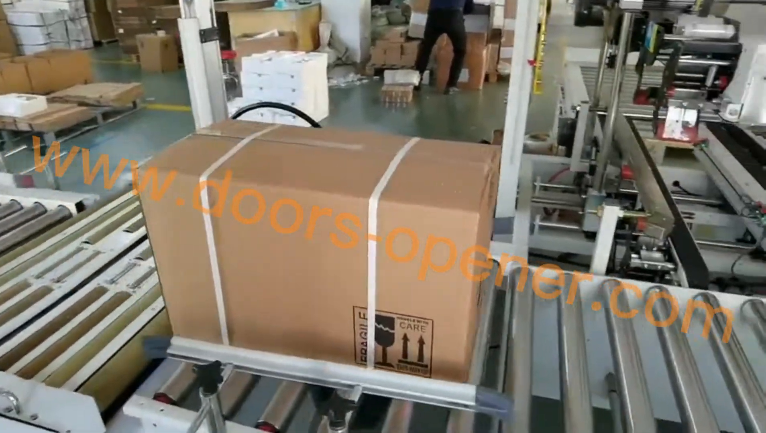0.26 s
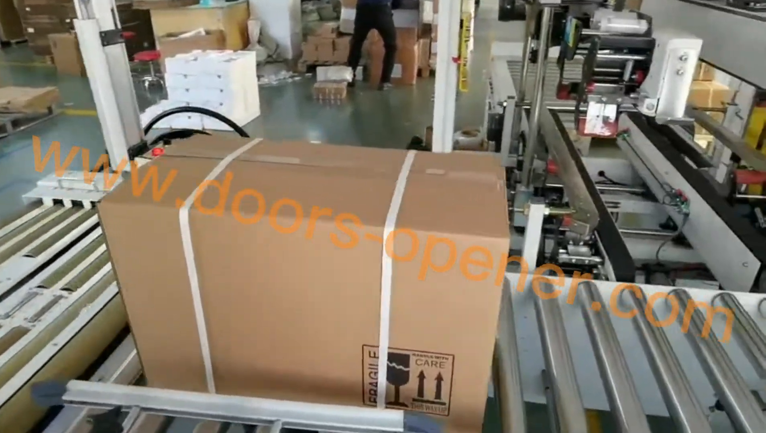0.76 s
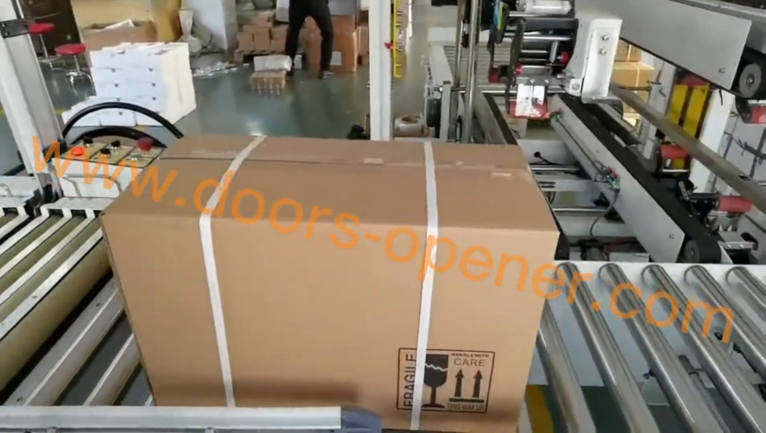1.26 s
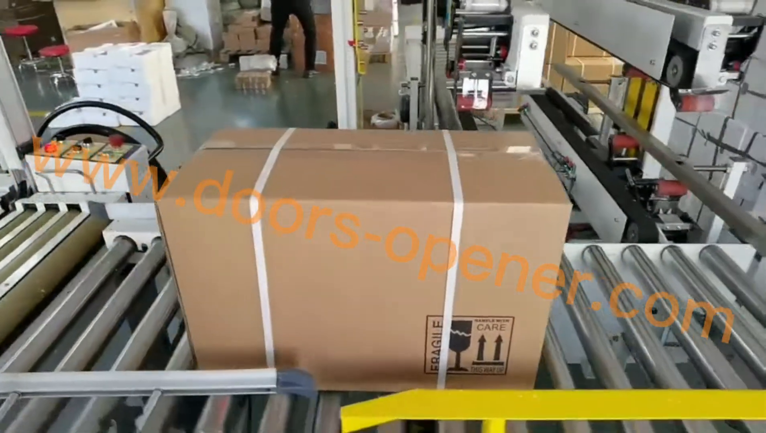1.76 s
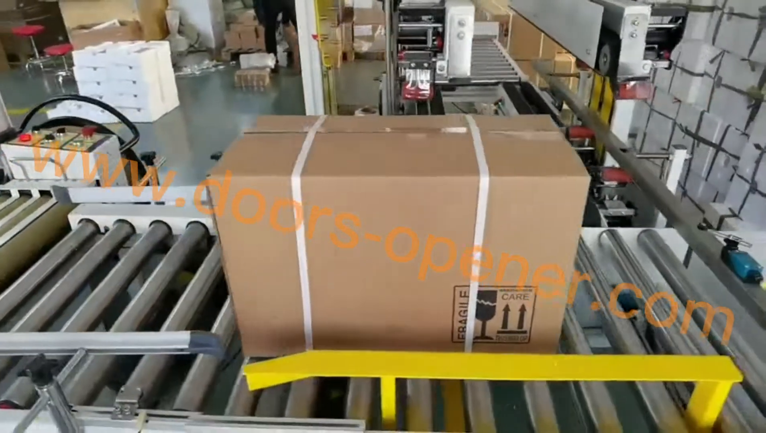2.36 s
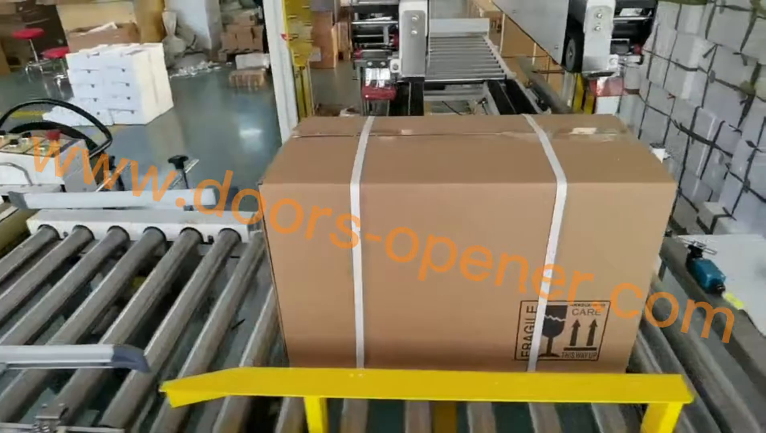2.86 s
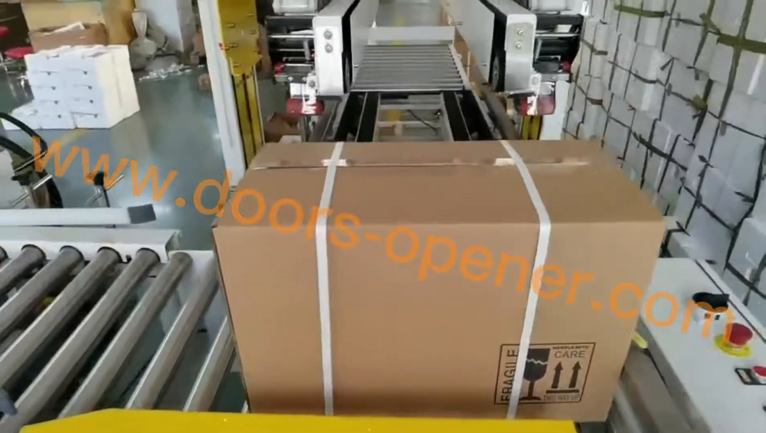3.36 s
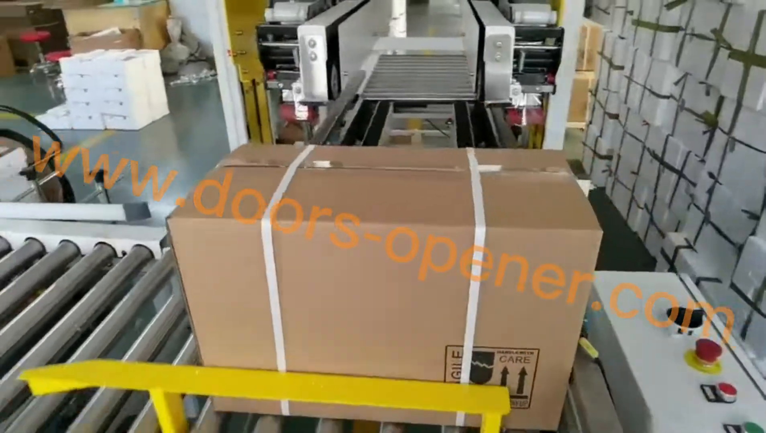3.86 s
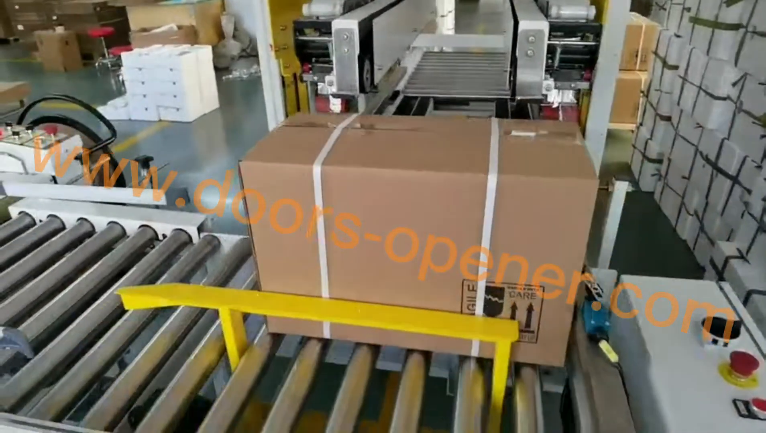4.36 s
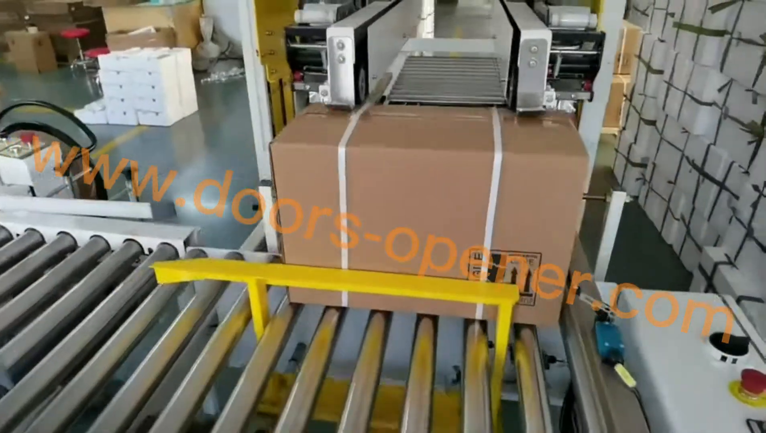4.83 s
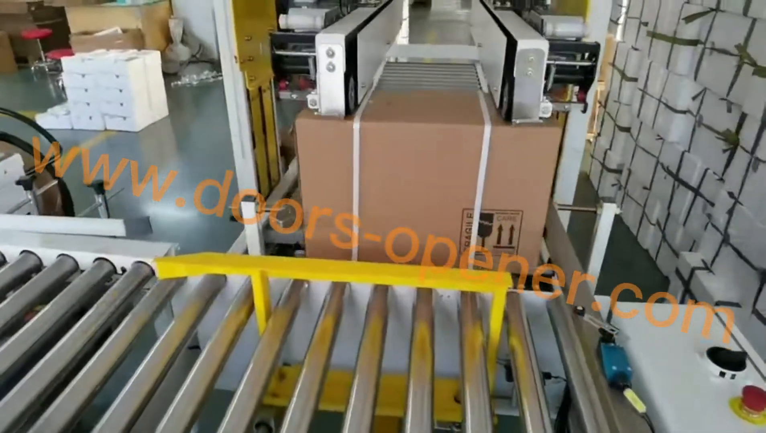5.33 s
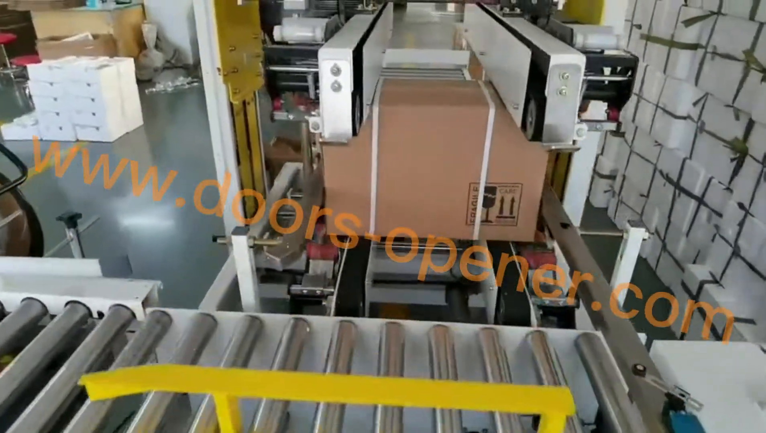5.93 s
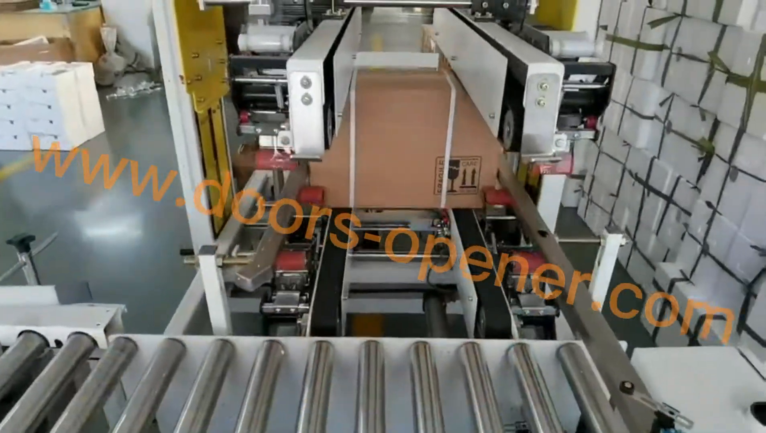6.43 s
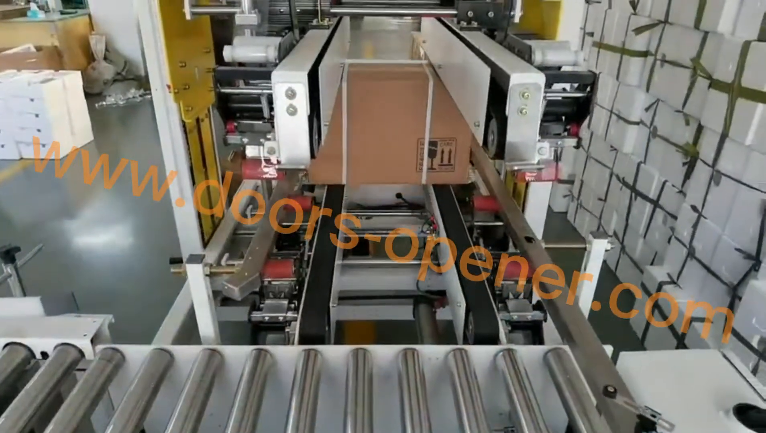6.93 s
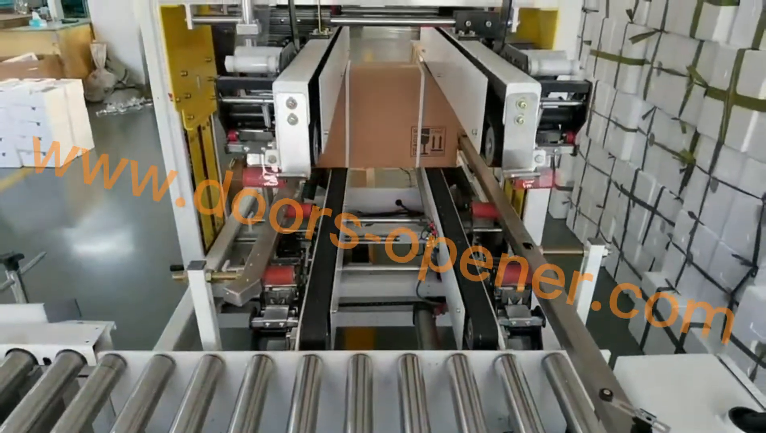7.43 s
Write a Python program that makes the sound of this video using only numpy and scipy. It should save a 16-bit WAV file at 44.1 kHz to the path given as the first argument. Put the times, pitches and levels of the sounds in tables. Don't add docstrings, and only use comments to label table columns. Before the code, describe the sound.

A conveyor whirrs and rumbles quietly before sharp bursts of escaping air, two hard clacks and short pneumatic puffs fill the factory hall.

```python
import sys
import numpy as np
from scipy import signal
from scipy.fft import rfft, irfft, next_fast_len
from scipy.io import wavfile

SR = 44100
rng = np.random.default_rng(int(sys.argv[2]) if len(sys.argv) > 2 else 0)


def natural_amplitude(level_db):
    exponent = np.asarray(level_db, float) / 20
    return 10 ** exponent


def unload_audio(sound):
    columns = np.transpose(np.atleast_2d(sound))
    steps = np.round(np.clip(columns, -1, 1) * 32767)
    wavfile.write(sys.argv[1], SR, steps.astype(np.int16))


N = 339129

# hz, left_right_likeness
EAR_LIKENESS = [(60, 0.72), (150, 0.92), (380, 1), (950, 0.5), (2380, 0.062), (5980, 0.099), (15000, 0.045)]
# hz, left_over_right_db
EAR_LEAN = [(60, 7), (150, 3), (380, 2), (950, 4.5), (2380, 7), (5980, -0.5), (15000, 7)]
ROLLER_LEAN = [(60, 2.5), (150, 2.0), (380, 0.5), (950, 3), (2380, 5), (5980, -1.5), (15000, 8)]

# time_s, rattle_db
ROLLER_LEVEL = [
    (0, -43.5),
    (1.2, -42),
    (1.9, -40),
    (2.8, -39.5),
    (6.7, -48.5),
    (7.69, -49),
]
# hz, db_per_hz
RATTLE_SPECTRUM = [(260, -34), (450, -1), (643, -7.5), (920, -4), (1280, -8), (1820, 1.5), (2380, -6),
                   (3030, 0), (4080, -7), (6180, -1.5), (6860, -7.5), (7730, -1), (11600, -22.5),
                   (14700, -27.5), (15800, -32)]

# time_s, bed_db, rails_db
CARTON_LOAD = [(0, -50, -51), (1.2, -50.5, -49), (2.7, -52, -47.5), (4.8, -46, -45.5), (4.89, -63, -50.5),
               (6.3, -61.5, -53.5), (6.9, -61, -54), (7.69, -57, -57)]
# peak_s, bed_db, rails_db, t60_s
CARTON_JOLTS = [(0.01, -38.5, -45, 0.46), (1.28, -46, -43.5, 1), (1.52, -41, -55, .4),
                (1.58, -55, -38.5, 1.5), (1.72, -55, -41, 0.4), (2.1, -42, -45, 1), (2.29, -57, -41.5, 0.5),
                (2.48, -60, -42.5, .9), (2.85, -38, -31.5, 0.47), (2.968, -24.5, -30.5, .6),
                (3.16, -41, -31.5, 0.33), (3.41, -37, -36, .5), (3.45, -31, -37, .5), (3.49, -40, -34, .25),
                (3.6, -33.5, -29, .5), (3.68, -35, -32, 0.46), (3.95, -38, -49, 0.67),
                (4.03, -36, -57, 0.47), (4.11, -37, -52, .2), (4.22, -38, -30, .5), (4.26, -28.5, -27, .5),
                (4.32, -40, -30.5, 0.57), (4.43, -37, -42, .3), (4.58, -36, -35, 1),
                (4.71, -33.5, -33, 0.37), (4.84, -36, -34, 0.12), (5.57, -53, -41.5, 1.14),
                (5.91, -44, -54, 0.49), (6.42, -35.5, -40.5, .7), (7.17, -42.5, -47.5, 0.51)]
# start_s, rise_s, hold_s, rails_db, t60_s
BELT_SHOVE = (7.62, .07, .1, -44, .3)
# hz, db_per_hz
RUMBLE_SPECTRUM = [(68, -21), (115, -6.5), (129, 0.5), (204, -5), (260, -0.5), (296, -3.5), (409, -6.5),
                   (541, -13.5), (700, -15.5), (910, -61), (1540, -120)]
# hz, width_hz, db_over_rumble
RAIL_HUM = [(132.7, 21, -10), (174, 27, -8), (204.3, 20, -10.5), (249.2, 23, -9.5), (300, 24, -10),
            (390, 39, -15.5)]

# start_s, peak_db, main_pitch_hz
STOP_BLOWS = [(1.314, -40, 200), (1.718, -37, 258), (2.266, -31, 320), (2.835, -31, 200), (3.131, -29, 278),
              (3.432, -26, 200), (3.577, -22, 450), (3.595, -23, 417), (4.238, -28, 220),
              (4.261, -23.5, 300), (4.699, -24, 300), (7.114, -36.5, 270), (7.647, -38.5, 270)]
# hz, level_db, t60_s
RAIL_MODES = [(140, -8, 0.33), (204, 0, 0.22), (270, -6, .22), (320, 3.5, 0.079), (418, 1.5, 0.094),
              (518, 0, 0.11), (676, 4, 0.047), (883, 0, 0.092), (2070, 20, .04)]

# start_s, peak_db, centre_hz, t60_s
TICK_EVENTS = [(0.1201, -29, 5980, 0.08), (0.196, -24, 8160, 0.07), (0.2693, -29, 6080, 0.087),
               (0.5707, -30, 7520, 0.16), (0.681, -20.5, 8090, 0.063), (0.9986, -25.5, 7980, 0.08),
               (1.3359, -39, 7850, 0.08), (1.489, -23.5, 7630, 0.074), (1.922, -24, 6070, 0.08),
               (1.9874, -29, 5770, 0.08), (2.1094, -33, 6600, 0.08), (2.1944, -29, 7980, 0.08),
               (2.368, -24, 7850, 0.08), (2.5094, -28, 6270, 0.08), (2.7496, -41, 6240, 0.08),
               (4.0053, -26, 7910, 0.071), (4.2862, -4, 7820, 0.07), (4.7012, -6, 7920, 0.053),
               (7.002, -39.5, 7690, 0.08), (7.1062, -35, 8410, 0.1), (7.1926, -39, 8230, 0.08),
               (7.231, -33, 7630, 0.08)]
# hz, db_per_hz
CRACK_SPECTRUM = [(2500, -30), (4000, -5), (8000, 5), (11000, -5), (16000, -15)]

# hz, db_per_hz
PUFF_SPECTRUM = [(290, -44), (500, -14), (836, -6), (901, -9), (1730, -7), (2310, 1), (2550, -7.5),
                 (7780, -15), (10000, -16.5), (13000, -51), (22000, -120)]

# start_s, end_s, from_hz, to_hz, level_db
THIN_WHISTLES = [
    (3.5, 3.67, 1590, 1620, -46.5),
    (3.699, 4.14, 1830, 1754, -48),
    (3.84, 4.01, 390, 390, -42.5),
    (3.802, 4.1, 1455, 1417, -47),
]
BREATHY_WHISTLES = [(2.846, 2.913, 7000, 7140, -26), (2.91, 2.96, 10000, 10160, -21),
                    (6.389, 6.442, 800, 840, -38), (6.442, 6.52, 900, 880, -29.5),
                    (5.835, 6.016, 841, 800, -40.5), (5.5, 5.74, 1943, 1850, -39)]
BROAD_WHISTLES = [
    (2.842, 2.9, 5550, 5600, -38),
    (2.963, 3.349, 3060, 2357, -37),
    (4.24, 4.294, 7200, 7500, -28),
    (6.217, 6.3, 4280, 3750, -38),
]

# hz, db_per_hz
JET_SPECTRUM = [(180, -26), (300, -22.5), (560, -20), (740, -15), (1030, -17), (1400, -13.5), (2190, -13.5),
                (3640, -16.5), (4660, -15), (7900, -1), (9600, -10), (10900, -17), (11500, -28.5),
                (15300, -31)]
# time_s, depth_db
JET_SPUTTER = [
    (2.9, 0),
    (4.7, 0.8),
    (4.85, 2.5),
    (5.3, 0.8),
    (5.45, 1),
    (5.8, 1.0),
    (6.5, 1.0),
]
# start_s, rise_s, hold_s, hiss_db, t60_s
PUSHER_VENT = [
    (2.86, 0.048, .01, -26.5, .2),
    (2.912, .012, 0.049, -16, 2.56),
    (2.914, .01, .004, -19, .35),
    (2.95, 0.31, 1.42, -27.5, 0.7),
    (3.86, 0.23, 0.056, -27.5, 1.9),
    (4.58, .12, .14, -22.5, 0.34),
]
PUSHER_STROKE = [
    (3.4, 0.14, 0.71, -45.5, .5),
    (4.2, 0.094, 0.49, -43, 0.44),
    (7.095, .006, .01, -52, .2),
]
CLAMP_VENT = [
    (4.74, 0.13, 0.863, -18, .3),
    (5.66, 0.063, .015, -22.5, 0.37),
    (5.9, .05, .5, -37, 0.33),
    (7.668, .012, .1, -30.5, .3),
]
FLAP_VENT = [
    (5.73, 0.035, 0.089, -26.5, .3),
    (5.79, .08, .035, -19, .27),
    (6.375, 0.014, 0.073, -18, 0.24),
]
GUIDE_VENT = [
    (6.205, .025, .005, -26, 0.62),
    (6.295, 0.027, .05, -21.5, .3),
]
# sizzle_db, rush_db, roar_db, breath_db (all over hiss), left_over_right_db
PUSHER_VOICE = (-12, -12, -29.5, -35.5, -3)
STROKE_VOICE = (-10, 2, 1.5, -7.5, -2.5)
CLAMP_VOICE = (-9, -13.5, -13, -20, -0.7)
FLAP_VOICE = (-18, -9.5, -13, -21, -1)
GUIDE_VOICE = (-15, -13, -24, -28, -.3)
BAND_LINGER = (0.99, 0.96, 1.2, 1.6, 1.85)


def rms_one(x):
    return x / np.sqrt(np.mean(x ** 2) + 1e-20)


def in_time(rows):
    time_s, *columns = np.transpose(rows)
    return [np.interp(np.arange(N) / SR, time_s, column) for column in columns]


def at_hz(points, hz):
    point_hz, value = np.transpose(points)
    return np.interp(np.log(hz), np.log(point_hz), value)


def drift(rate_hz):
    r = np.exp(-80 * np.pi * rate_hz / SR)
    slow = signal.lfilter([1], [1, -2 * r, r * r], rng.standard_normal(N // 40 + 2002))[2000:]
    return np.interp(np.arange(N) / 40, np.arange(len(slow)), rms_one(slow))


def coloured(spectrum, alike=0.87, lean=EAR_LEAN, direct=0.0, lag_samples=0):
    size = next_fast_len(N)
    hz = np.maximum(np.arange(size // 2 + 1) * SR / size, 1)
    mid, side = rfft(rng.standard_normal((2, size)))
    like = np.clip(np.maximum(alike * at_hz(EAR_LIKENESS, hz), direct), 0, 1)
    ears = np.sqrt(1 + like) * mid + np.sqrt(1 - like) * side * [[1], [-1]]
    ears[0] *= np.exp(-2j * np.pi * hz * lag_samples / SR)
    tilt = natural_amplitude(at_hz(lean, hz) / 2 * np.array([[1], [-1]]))
    return irfft(ears * tilt * natural_amplitude(at_hz(spectrum, hz)), size)[:, :N]


def band(x, low_hz, high_hz):
    sos = signal.butter(3, [low_hz, high_hz], "band", fs=SR, output="sos")
    part = signal.sosfilt(sos, x)
    return part / np.sqrt(np.mean(part.mean(axis=0) ** 2))


def narrow(width_hz):
    r = np.exp(-np.pi * width_hz / SR)
    real, imaginary = signal.lfilter([1], [1, -2 * r, r * r], rng.standard_normal((2, N)))
    return (real + 1j * imaginary) / np.sqrt(np.mean(real ** 2))


def chance_hits(rate_per_s, t60_s):
    hits = (rng.random(N) < rate_per_s / SR) * rng.exponential(1, N)
    return signal.lfilter([1], [1, -natural_amplitude(-60 / (t60_s * SR))], hits + 1e-18)


def dying(start_s, t60_s):
    age_s = np.arange(N) / SR - start_s
    return (age_s >= 0) * natural_amplitude(-60 * np.maximum(age_s, 0) / t60_s)


def swell(start_s, rise_s, hold_s, level_db, t60_s):
    age_s = np.arange(0, N + 20, 20) / SR - start_s
    release_s = np.maximum(age_s - rise_s - hold_s, 0)
    return (np.clip(age_s / rise_s, 0, 1) ** 2 * natural_amplitude(level_db - 60 * release_s / t60_s)) ** 2


def fill(coarse):
    return np.interp(np.arange(N) / 20, np.arange(len(coarse)), coarse)


def shaking():
    rise_s = 0.055
    bed_jolts = sum(swell(s - rise_s, rise_s, 0, bed_db, t60_s) for s, bed_db, _, t60_s in CARTON_JOLTS)
    rail_jolts = sum(swell(s - rise_s, rise_s, 0, rail_db, t60_s) for s, _, rail_db, t60_s in CARTON_JOLTS)
    rail_jolts = rail_jolts + swell(*BELT_SHOVE)
    bed_db, rails_db = in_time(CARTON_LOAD)
    bed_db = bed_db + 1.5 * drift(6)
    rails_db = rails_db + 1.2 * drift(4.4)
    return 10 * np.log10([natural_amplitude(2 * bed_db) + fill(bed_jolts), natural_amplitude(2 * rails_db) + fill(rail_jolts)])


def deep_floor():
    noise = coloured([(20, -14), (100, 0)], alike=.85, lean=ROLLER_LEAN)
    return natural_amplitude(-71.5 + 0.31 * (shaking()[0] + 52)) * band(noise, 20, 76)


def rollers():
    level_db, = in_time(ROLLER_LEVEL)
    throb = 1 + 0.12 * chance_hits(45, .12)
    throb = throb / np.sqrt(np.mean(throb ** 2))
    noise = coloured(RATTLE_SPECTRUM, alike=0.46, lean=ROLLER_LEAN)
    rattle = band(noise, 4570, 17300) * throb * natural_amplitude(1.22 * drift(34))
    whirr = band(noise, 510, 5590) * natural_amplitude(-3.5 + 0.66 * drift(9.1) + 1.17 * drift(26))
    return natural_amplitude(level_db) * (rattle + whirr)


def frame():
    bed_hz, bed_width_hz = 99.4, 16.2
    boom_db, rumble_db = shaking()
    turns = 2j * np.pi * np.arange(N) / SR
    wander = narrow(bed_width_hz)
    wander /= np.abs(wander) ** 0.4 + 1e-9
    boom = rms_one((wander * np.exp(bed_hz * turns)).real)
    hum = 0
    for hz, width_hz, level_db in RAIL_HUM:
        tone = (narrow(width_hz) * np.exp(hz * turns)).real
        hum = hum + natural_amplitude(level_db + 2.4 * drift(2.5)) * tone
    rumble = 0.59 * rms_one(coloured(RUMBLE_SPECTRUM)) * natural_amplitude(0.54 * drift(23))
    opposed = natural_amplitude([[.8], [-.8]])
    return (natural_amplitude(boom_db) * boom + natural_amplitude(rumble_db) * hum) * opposed + natural_amplitude(rumble_db) * rumble


def thuds():
    out = np.zeros(N)
    luck_db = rng.normal(0, 0.46, (len(STOP_BLOWS), len(RAIL_MODES)))
    for (start_s, peak_db, main_hz), blow_luck_db in zip(STOP_BLOWS, luck_db):
        start = round(start_s * SR)
        age_s = np.arange(min(SR // 2, N - start)) / SR
        for (hz, mode_db, t60_s), extra_db in zip(RAIL_MODES, blow_luck_db):
            near_db = -12 * abs(np.log2(hz / main_hz))
            fall = natural_amplitude(mode_db + extra_db + near_db - 60 * age_s / t60_s)
            ring = fall * np.sin(2 * np.pi * hz * age_s)
            out[start:][:len(age_s)] -= natural_amplitude(peak_db - 4.5) * ring
    return out * natural_amplitude([[.8], [-.8]])


def ticks():
    out = np.zeros((2, N))
    crack = band(coloured(CRACK_SPECTRUM, direct=0.35), 2700, 12000)
    for start_s, peak_db, hz, t60_s in TICK_EVENTS:
        start = round(start_s * SR)
        at = slice(start, min(N, start + SR // 4))
        age_s = np.arange(at.stop - at.start) / SR
        ring = np.sin(2 * np.pi * hz * age_s) + 0.2 * np.sin(2 * np.pi * 1.2 * hz * age_s)
        ring = natural_amplitude(-60 * age_s / (0.47 * t60_s)) * ring
        burst = 0.47 * natural_amplitude(-60 * age_s / t60_s) * crack[:, at]
        out[:, at] += natural_amplitude(peak_db - 8.5) * (ring + burst)
    return out


def puff():
    start_s, level_db, hold_s, t60_s = 1.553, -31.5, 0.078, 0.39
    noise = coloured(PUFF_SPECTRUM, alike=.6, direct=0.16)
    out = 0
    for low_hz, high_hz, part_db, late_s, stretch in [(1500, 12000, -3, 0, 0.86), (400, 1400, -9.5, 0.05, 1.35)]:
        rise = np.clip((np.arange(N) / SR - start_s) / (0.0085 + late_s), 0, 1)
        fall = np.minimum(1, dying(start_s, stretch * t60_s) * natural_amplitude(60 * hold_s / t60_s))
        out = out + natural_amplitude(level_db + part_db) * rise * fall * band(noise, low_hz, high_hz)
    return out


def whistles():
    out = np.zeros(N)
    t = np.arange(N) / SR
    for rows, width_hz in [(THIN_WHISTLES, 42), (BREATHY_WHISTLES, 160), (BROAD_WHISTLES, 550)]:
        wander = narrow(width_hz)
        for start_s, end_s, from_hz, to_hz, level_db in rows:
            at = slice(round(start_s * SR), round(end_s * SR))
            glide_hz = np.interp(t[at], [start_s, end_s], [from_hz, to_hz])
            phase = 2 * np.pi * np.cumsum(glide_hz) / SR
            gate = np.sin(np.pi * np.clip((t[at] - start_s) / (end_s - start_s), 0, 1) ** 0.56)
            out[at] += natural_amplitude(level_db) * gate * (wander[at] * np.exp(1j * phase)).real
    return out


def reflected(x):
    span_s, echo_db, sway_s = .008, -8.5, .0004
    delays_s = rng.uniform(.1, 1, (2, 6)) * span_s
    signs = rng.choice([-1, 1], (2, 6))
    clock, out = np.arange(N), x.copy()
    for k in range(6):
        sway = sway_s * drift(.4)
        for ear in range(2):
            delay = ((delays_s[ear, k] + sway) * SR).astype(int)
            out[ear] += signs[ear, k] * natural_amplitude(echo_db) * x[ear][np.clip(clock - delay, 0, N - 1)]
    return out


def nozzle_power(openings, voice, k):
    *voice_db, pan_db = voice
    band_db, linger = [0, *voice_db][k], BAND_LINGER[k]
    flow = sum(swell(start_s, rise_s * np.sqrt(linger), hold_s, hiss_db + band_db, t60_s * linger)
               for start_s, rise_s, hold_s, hiss_db, t60_s in openings)
    return flow * natural_amplitude((pan_db - 0.5) * np.array([[1], [-1]]))


def venting():
    nozzles = [(PUSHER_VENT, PUSHER_VOICE), (PUSHER_STROKE, STROKE_VOICE), (CLAMP_VENT, CLAMP_VOICE),
               (FLAP_VENT, FLAP_VOICE), (GUIDE_VENT, GUIDE_VOICE)]
    noise = reflected(coloured(JET_SPECTRUM, alike=1.0, direct=0.4, lag_samples=4.25))
    sputter, = in_time(JET_SPUTTER)
    flutter_db = .5 * drift(18) + sputter * drift(106) + .4 * drift(7)
    bands_hz = [(4500, 11000), (11000, 16500), (2400, 4500), (900, 2300), (230, 900)]
    jet = 0
    for k, (low_hz, high_hz) in enumerate(bands_hz):
        power = sum(nozzle_power(openings, voice, k) for openings, voice in nozzles)
        gain = [fill(np.sqrt(ear)) for ear in power]
        jet = jet + band(noise, low_hz, high_hz) * gain * natural_amplitude(0.32 * drift(15))
    crackle = .45 * sputter * chance_hits(70, .009)
    return jet * natural_amplitude(flutter_db) * (1 + np.minimum(np.abs(crackle), 2.2))


def scene():
    return rollers() + frame() + thuds() + ticks() + puff() + whistles() + venting()


def top_cut(x):
    return signal.sosfilt(signal.butter(12, 15700, fs=SR, output="sos"), x)


def record(dry):
    ceiling = .95
    cut = signal.sosfilt(signal.butter(4, 84, "high", fs=SR, output="sos"), dry)
    mix = ceiling * np.tanh((cut + deep_floor()) / ceiling)
    return top_cut(mix)


dry = scene()
out = record(dry)
unload_audio(out)
```